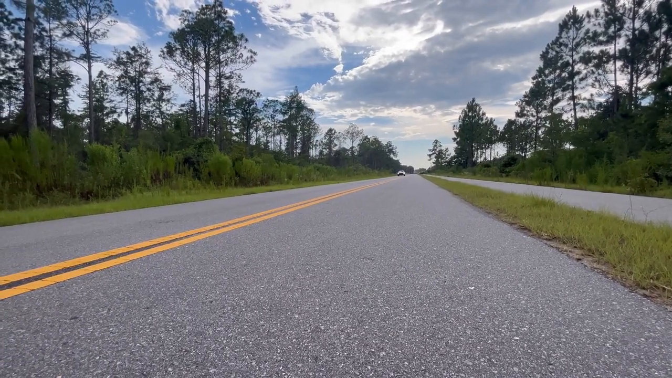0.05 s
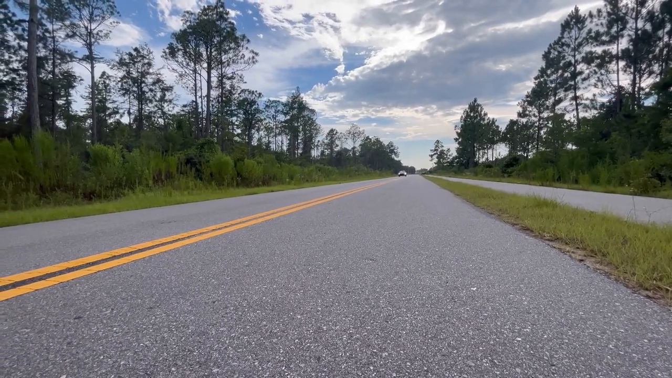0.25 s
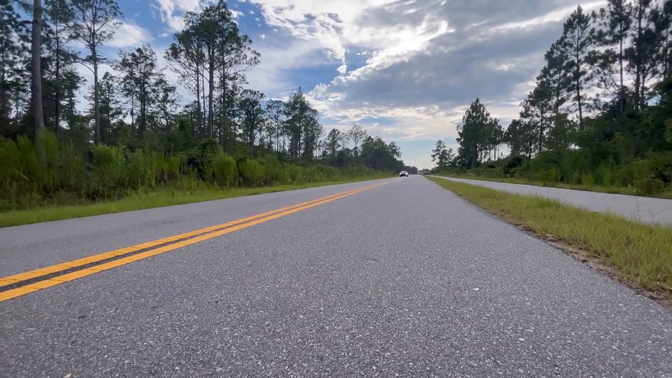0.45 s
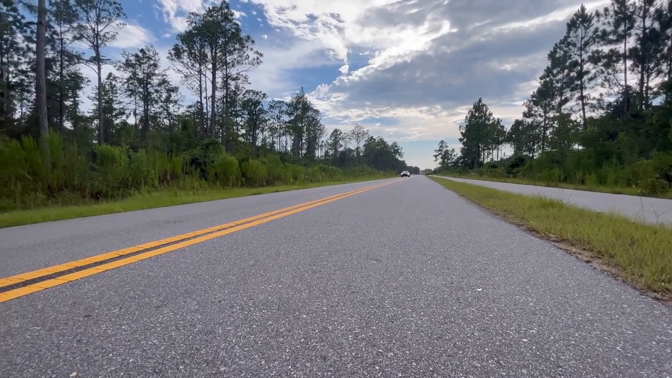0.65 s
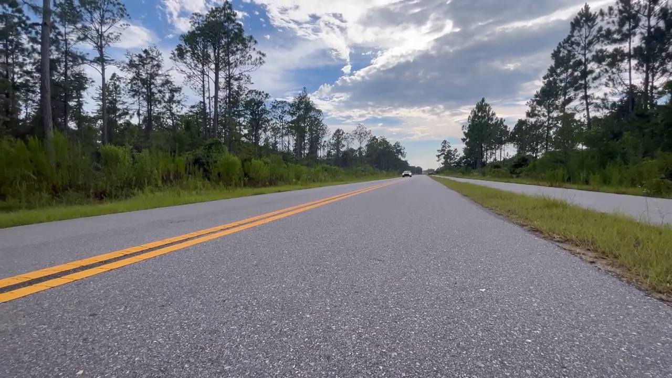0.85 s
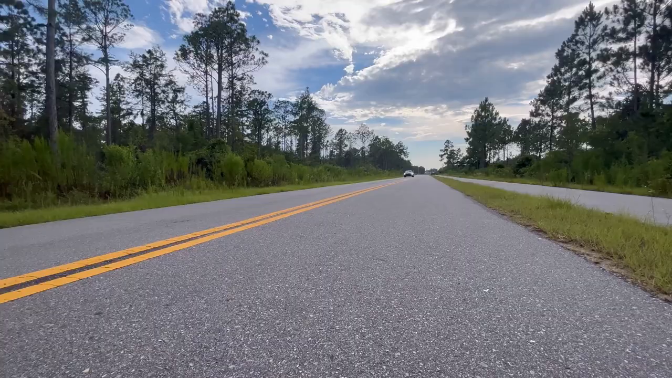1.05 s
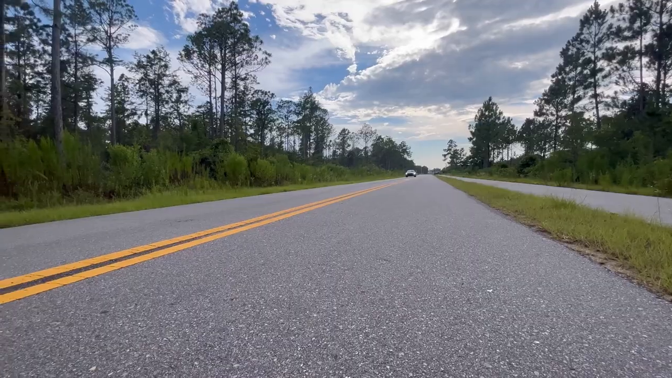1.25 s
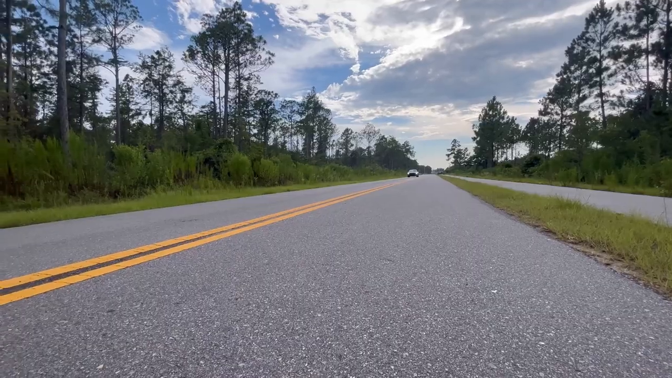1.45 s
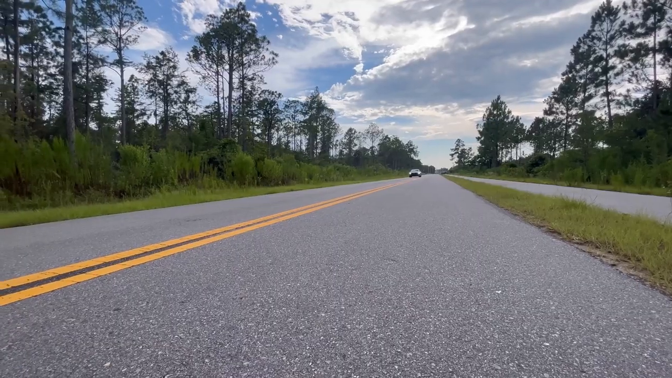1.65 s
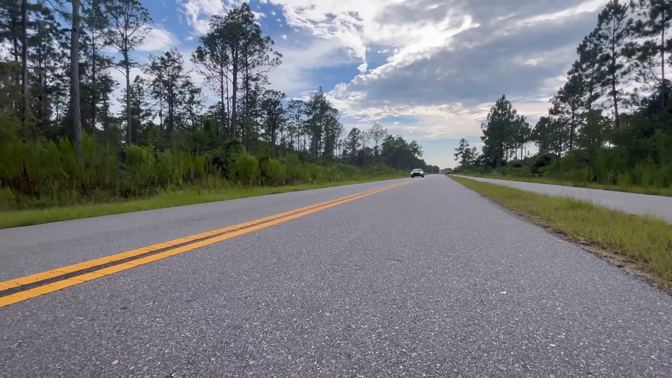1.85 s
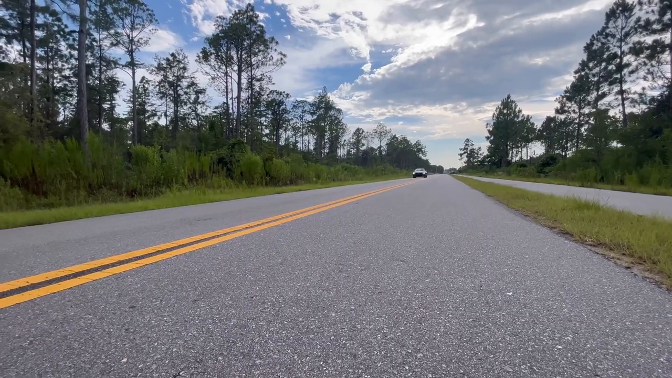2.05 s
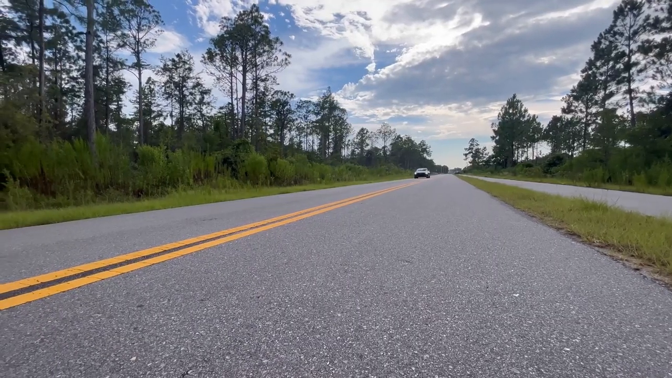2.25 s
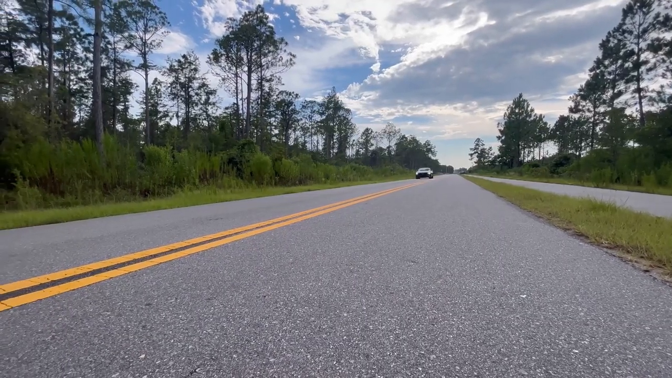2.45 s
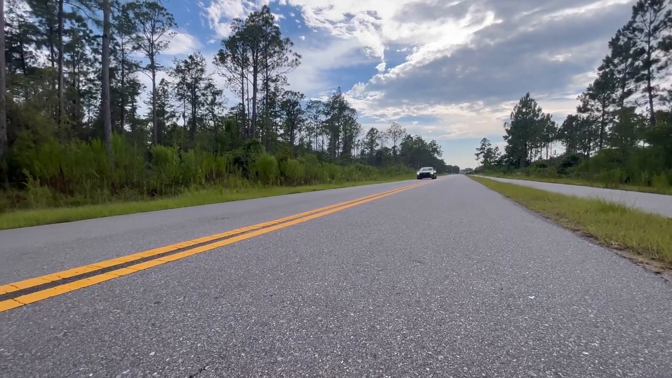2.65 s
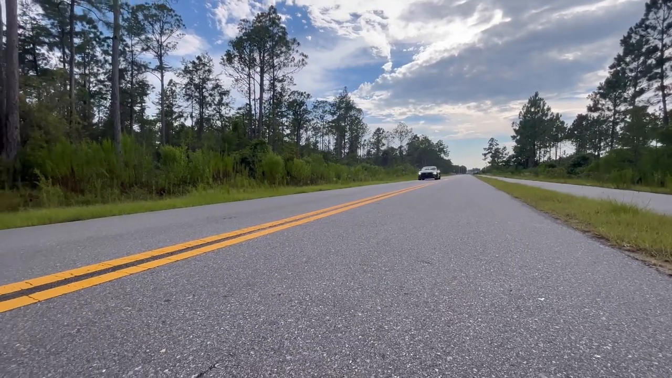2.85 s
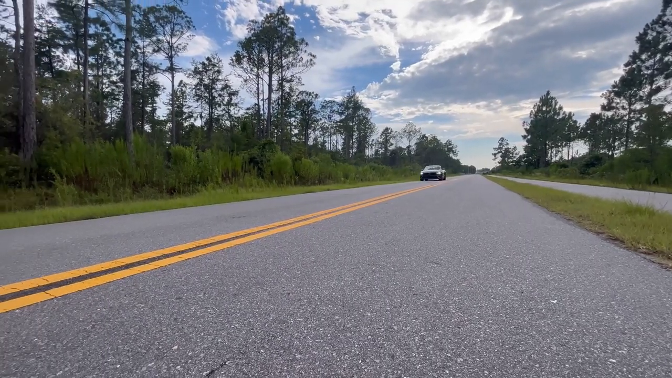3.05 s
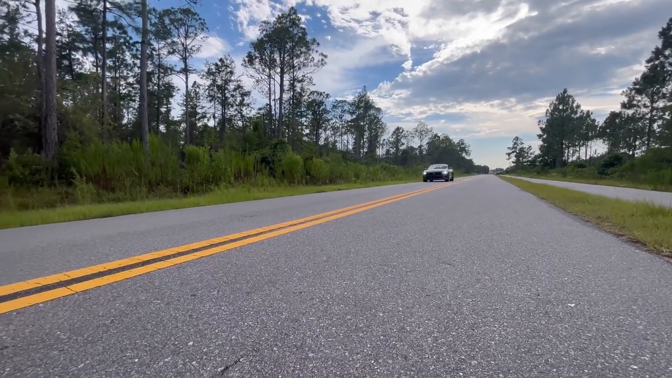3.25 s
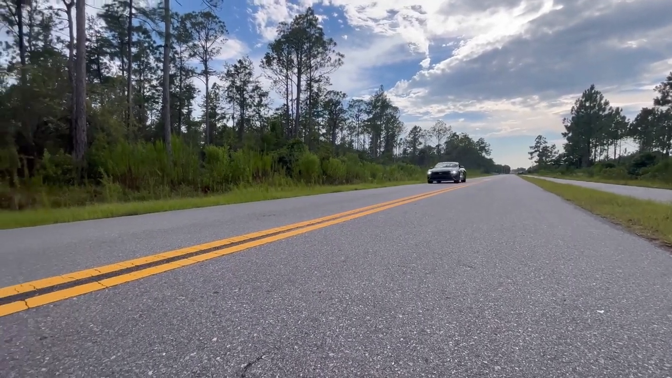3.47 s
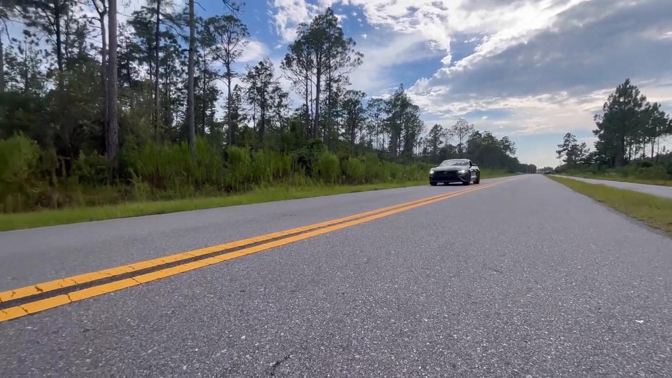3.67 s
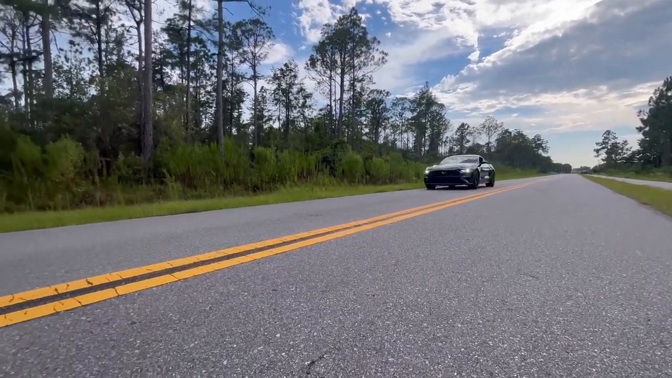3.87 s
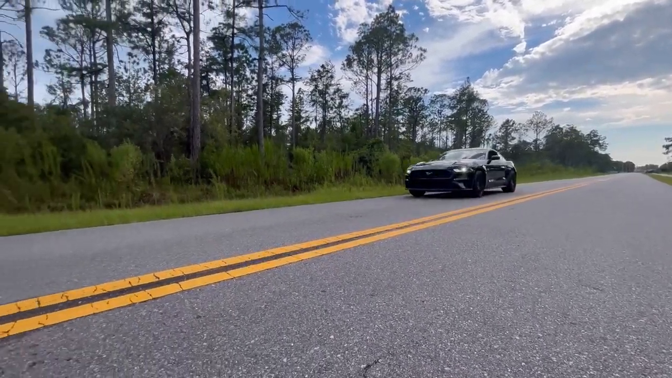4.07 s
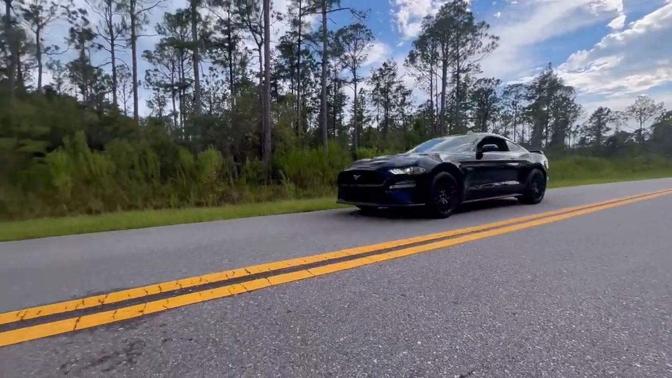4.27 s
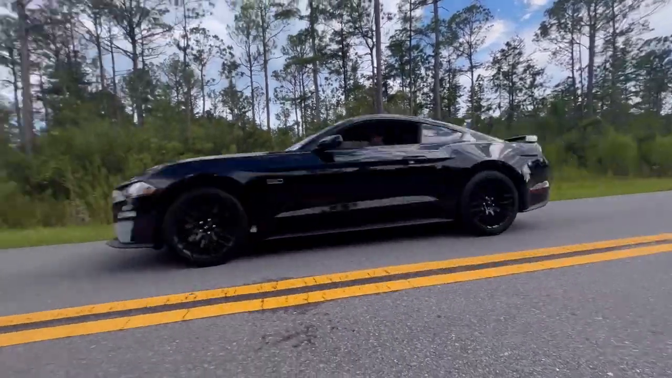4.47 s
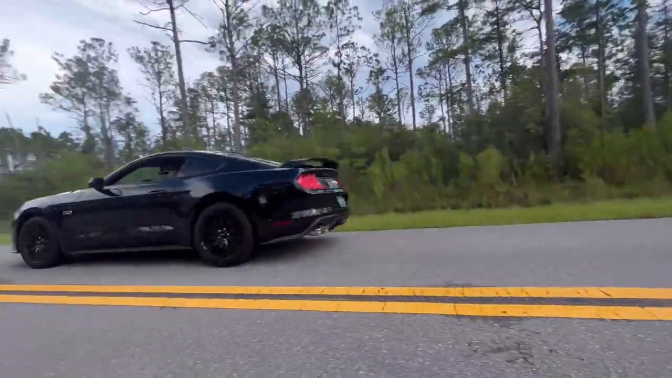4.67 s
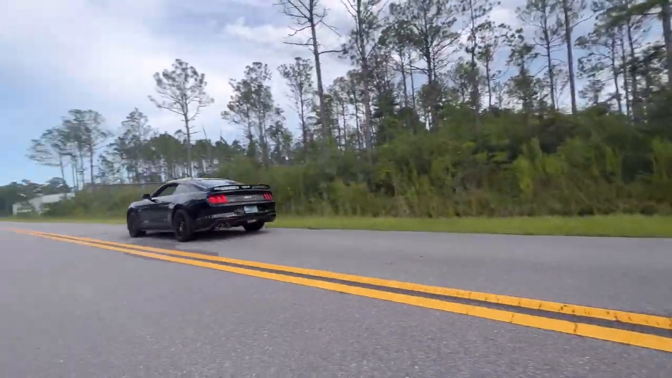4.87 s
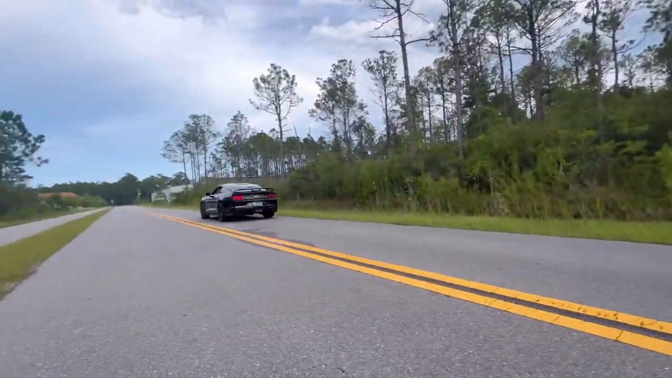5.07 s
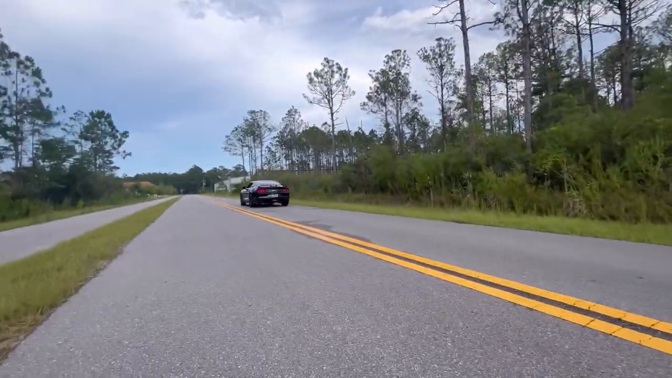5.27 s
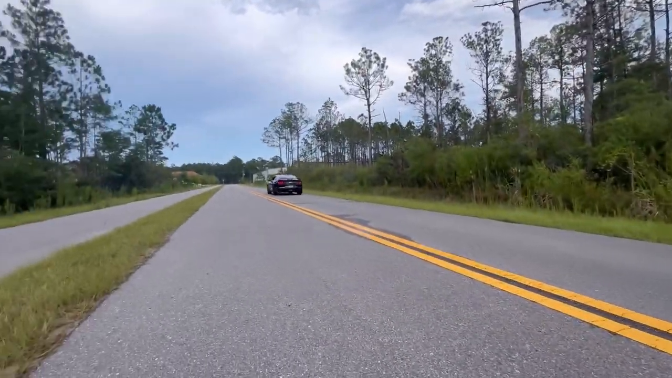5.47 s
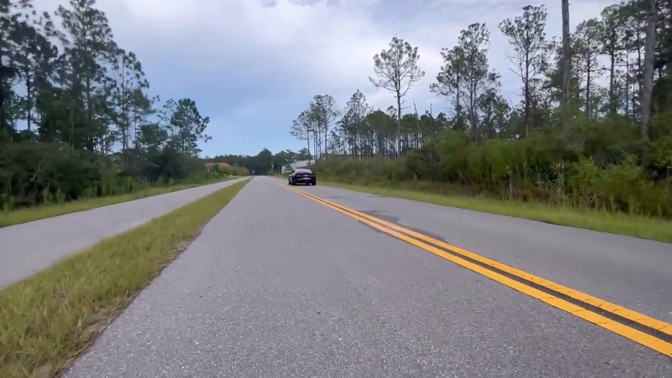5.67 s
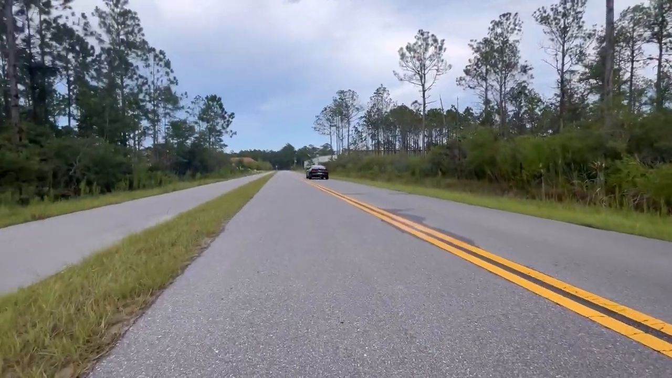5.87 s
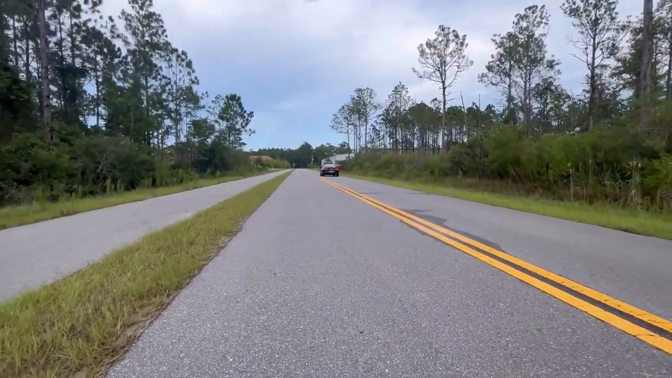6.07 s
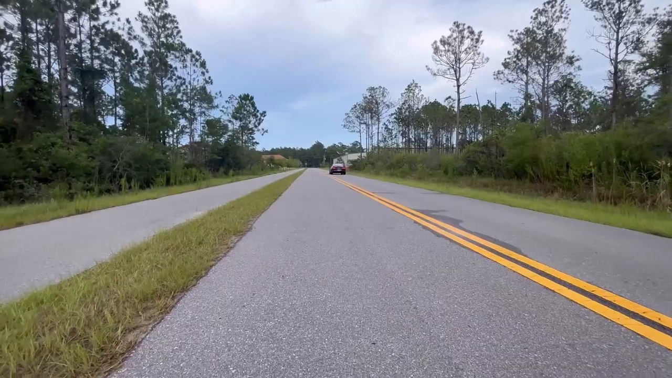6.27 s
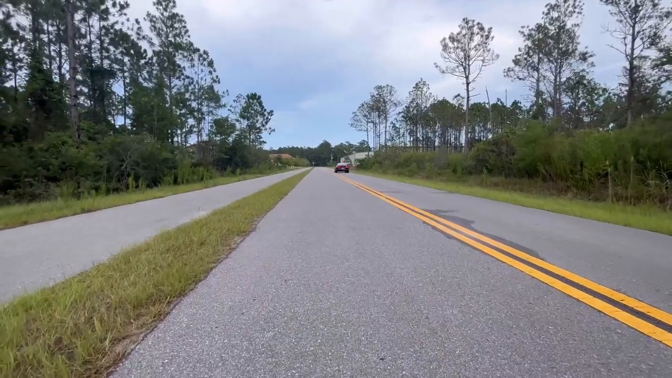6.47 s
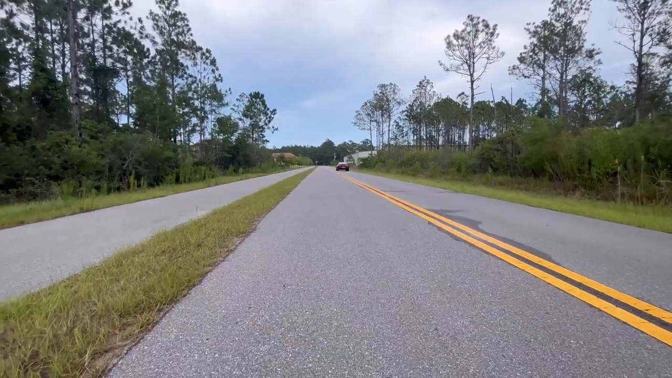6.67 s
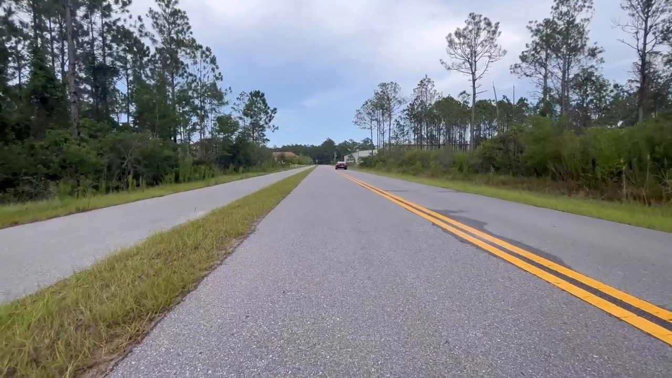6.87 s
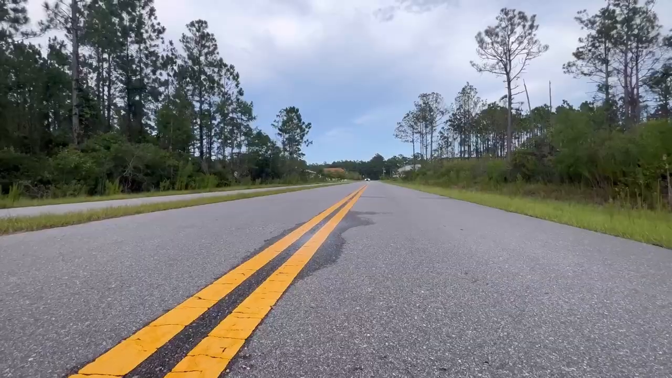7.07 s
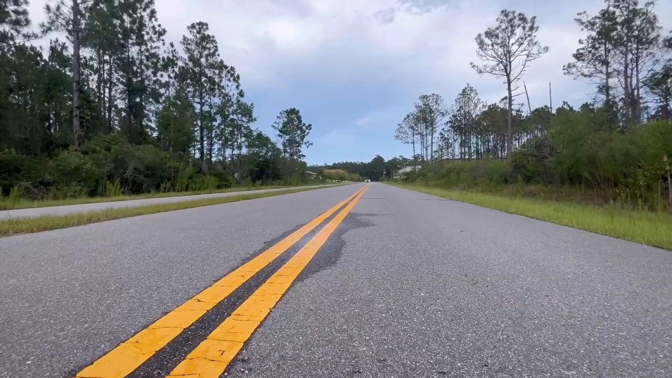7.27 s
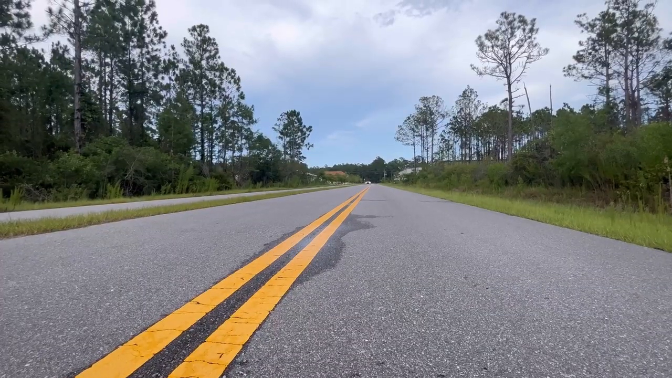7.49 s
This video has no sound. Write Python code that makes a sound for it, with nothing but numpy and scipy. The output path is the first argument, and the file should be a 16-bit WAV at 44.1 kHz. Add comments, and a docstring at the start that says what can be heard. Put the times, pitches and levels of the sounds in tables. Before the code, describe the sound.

Beside a country road among pines, a V8 sports car with a loud, uneven exhaust starts distant, its low growl climbing in pitch and swelling until about 2.1 s. The throttle lifts: pitch sags and the tone breaks into a loose, fluttering burble, with soft tyre hiss. At about 3.15 s full throttle returns abruptly, a thick roar growing with a brightening, barking rasp. It is closest around 4.5 s, with broad tyre hiss and a brief tread whine. From 4.55 to 5.2 s rapid dry snaps crack from the tailpipes, strongest near 4.8 s, as pitch drops slightly. The rasp recedes, with a few weak snaps at 5.5 s. Near 5.9 s the note breaks off for a gear change, coughs back at 6.1 s and drones faintly, blurred by forest scatter. At 7.03 s a cut: a quiet, dull distant engine accelerates over very thin high insects until 7.5 s.

```python
"""A V8 sports car with a loud exhaust on a country road lined with pines, heard from the roadside.
It pulls in the distance, lifts off and burbles, then roars up to the microphone at full throttle.
It passes with snaps and tyre hiss, recedes rasping and changes gear; then the scene cuts to a new distant
approach, the car accelerating. Uneven firings make a low tone of many lines, pulsed gas noise the rasp and
cracks, dry bursts the snaps; filtered noise makes the tyres, the forest scatter and, after the cut, insects."""
import sys
import numpy as np
from scipy import signal
from scipy.fft import rfft, irfft
from scipy.io import wavfile
from scipy.ndimage import uniform_filter1d

SR = 44100
rng = np.random.default_rng(int(sys.argv[2]) if len(sys.argv) > 2 else 0)


def file_out(sig):
    """Save sig as 16-bit WAV at sys.argv[1]."""
    # one column per channel
    cols = np.atleast_2d(sig).T
    # limit, then scale
    lim = np.clip(cols, -1, 1)
    pcm = np.round(lim * 32767).astype(np.int16)
    wavfile.write(sys.argv[1], SR, pcm)


N = 332073
TIME = np.arange(N) / SR

# the driver's pedal: (start [s], end [s]), and how long the pedal takes to act
LIFT_OFF, FULL_THROTTLE, PEDAL_S = (2.1, 3.117), (3.156, 6.12), 0.012
SHIFT_S, SHIFT_WIDTH_S = 5.89, 0.16   # the engine note breaks off for a gear change
REAR_IN_VIEW = (4.68, 0.2)   # the rear faces the microphone: (time [s], transition [s])
NEXT_PASS_S = 7.03   # the scene cuts to the next approach
# the eight firings of a cycle: (place in the cycle [0-1], strength [dB])
FIRINGS = [(.035, -8), (.155, -6), (.285, -11), (.415, -7), (.522, 0), (.655, -7), (.785, -8), (.91, -1.8)]
# rasp and sizzle: (low edge [Hz], high edge [Hz], base level when near [dB], share of the loudness swing,
# added at full throttle [dB], added lifted off [dB], added receding [dB])
REGISTERS = [(554, 1994, -21, 1.268, 1.5, -5.5, 7), (2120, 9250, -41.5, 1.29, 1, -0.8, 2.5)]


def from_db(db):
    """Decibels to gain."""
    return 10 ** (np.asarray(db) / 20)


def rms_one(x):
    """Scale to unit power."""
    return x / np.sqrt(np.mean(x ** 2) + 1e-20)


def in_time(rows):
    """Each column of a curve at every sample."""
    s, *columns = np.transpose(rows)
    return [np.interp(TIME, s, c) for c in columns]


def step(s, width_s):
    """A smooth rise from 0 to 1 around time s."""
    return .5 + .5 * np.tanh((TIME - s) / width_s)


def hump(s, width_s, height=1):
    """A bell-shaped swell around time s."""
    return height * np.exp(-((TIME - s) / width_s) ** 2 / 2)


def during(start_s, end_s):
    """1 while the pedal is held, with soft edges."""
    return step(start_s, PEDAL_S) - step(end_s, PEDAL_S)


def first_pass():
    """1 until the cut to the next approach."""
    return 1 - step(NEXT_PASS_S, .008)


def drift(rate):
    """Slow chance with spread 1, from noise through a two-pole lowpass at a fortieth of the sample rate."""
    r = np.exp(-80 * np.pi * rate / SR)
    noise = rng.standard_normal(N // 40 + 2002)
    slow = signal.lfilter([1], [1, -2 * r, r * r], noise)[2000:]
    return np.interp(np.arange(N) / 40, np.arange(len(slow)), rms_one(slow))


def stereo_noise(alike):
    """White noise of which a share of the power is common to both sides."""
    common = np.sqrt(alike) * rng.standard_normal(N)
    return common + np.sqrt(1 - alike) * rng.standard_normal((2, N))


def coloured(x, spectrum):
    """Causal (minimum-phase) filter with the given spectrum; unit power out."""
    size = 4096
    hz, db = np.transpose(spectrum)
    bins_hz = np.fft.rfftfreq(size, 1 / SR)
    log_gain = np.log(from_db(np.interp(np.log(bins_hz + 1), np.log(hz), db)))
    # folding the cepstrum forward in time makes the phase minimal
    cepstrum = irfft(log_gain) * np.r_[1, np.full(size // 2 - 1, 2), np.zeros(size // 2)]
    response = irfft(np.exp(rfft(cepstrum)))
    return rms_one(signal.oaconvolve(np.atleast_2d(x), response[None], axes=1)[:, :N])


def resonance(hz, centre_hz, width_hz, db):
    """The lift in dB that a resonance gives a line at hz."""
    return db / (1 + ((hz - centre_hz) / width_hz) ** 2)


def swept(x, hz, width_hz, block=256):
    """A resonance whose centre moves block by block; gain 1 on top."""
    out, state = np.zeros_like(x), np.zeros((len(x), 2))
    r = np.exp(-np.pi * width_hz / SR)
    zeros = np.array([1, 0, -1]) * (1 - r * r) / 2
    for i in range(0, N, block):
        poles = [1, -2 * r * np.cos(2 * np.pi * hz[i] / SR), r * r]
        out[:, i:i + block], state = signal.lfilter(zeros, poles, x[:, i:i + block], zi=state)
    return out


def register(x, low, high, db):
    """One band of a stereo sound, its slow level evened out and then set to db."""
    band_filter = signal.butter(4, [low, high], "band", fs=SR, output="sos")
    band = signal.sosfilt(band_filter, x)
    power = uniform_filter1d(uniform_filter1d(band.mean(0) ** 2, size=4900), size=3300)
    return band * from_db(db) / np.sqrt(np.abs(power) + 1e-12)


def forest(x, t60):
    """Countless trunks scatter the sound into a dying tail, different on each side."""
    age = np.arange(SR) / SR
    tail = rng.standard_normal((2, SR)) * from_db(-60 * age / t60)
    return rms_one(signal.oaconvolve(np.atleast_2d(x), tail, axes=1)[:, :N])


def radiated(x, direct_db, forest_t60=1.0, common=0.198):
    """Direct sound plus forest scatter, partly alike on both sides."""
    direct, scatter = from_db(direct_db), forest(x, forest_t60)
    scatter = rms_one(scatter + common * scatter[::-1])
    return (direct * x + scatter) / np.sqrt(1 + direct ** 2)


def from_bearing(x, lead_ms):
    """The nearer side hears the sound first; a positive lead is to the left."""
    return np.array([np.interp(TIME + side * lead_ms / 2000, TIME, x) for side in (1, -1)])


def manner(front_roar=0.43, rear_share=0.64):
    """How the pedal and the car's bearing set its roar, its directness and its stumbling."""
    floored, lifted = during(*FULL_THROTTLE), during(*LIFT_OFF)
    shifting = hump(SHIFT_S, SHIFT_WIDTH_S)
    passed = step(*REAR_IN_VIEW) * first_pass()
    before_shift = 1 - step(SHIFT_S - SHIFT_WIDTH_S, SHIFT_WIDTH_S)
    wide_open = floored * before_shift * (front_roar + (1 - front_roar) * passed)
    wide_open, behind = np.clip([wide_open, rear_share * passed], 0, 1)
    # direct over forest sound [dB]
    direct_db = -6.5 + 0.5 * floored + 7 * behind - 8.5 * shifting
    direct_db += hump(4.25, 0.19, 13)   # direct sound outweighs the forest as the car nears
    direct_db += 5 * step(6.54, 0.102) * first_pass()   # down the straight road the pops arrive crisp
    # uneven, stumbling combustion relative to the steady tone [dB], growing through the lift-off
    stumble_db = -17 + 18 * lifted * np.interp(TIME, LIFT_OFF, (0, 1)) + 12 * shifting
    # lead of the left ear as the car comes and goes
    front_lead_ms, back_lead_ms = -0.13, 0.14
    lead_ms = front_lead_ms * (1 - passed) + back_lead_ms * passed * wide_open
    return wide_open, behind, direct_db, stumble_db, lead_ms


def register_levels():
    """Rasp and sizzle follow the loudness, the pedal and the way the car points, in dB."""
    # loudness of rasp and sizzle, set by distance and effort: (time [s], level [dB])
    loudness = [(0.0, -33.5), (0.6, -29), (1.2, -28), (1.95, -24.5), (2.65, -29), (3.1, -28.5),
                (3.5, -21.5), (4.1, -18.5), (4.65, -19.5), (5.0, -25.5), (5.25, -31.5), (5.55, -32.5),
                (5.95, -49.5), (6.45, -43.5), (7.02, -44), (7.04, -52), (7.5, -43.5)]
    loud_db = in_time(loudness)[0] + 20   # relative to the car near the microphone
    # brief swells of the sizzle: (time [s], width [s], lift [dB])
    sizzle_swells = [(4.79, 0.036, 2), (5.12, 0.47, 10)]
    floored, lifted = during(*FULL_THROTTLE), during(*LIFT_OFF)
    receding = step(4.887, 0.046) * first_pass()   # the tailpipes point straight back
    levels = []
    for row, next_pass_db in zip(REGISTERS, (4, -0.5)):
        _, _, db, share, floored_db, lifted_db, receding_db = row
        level = db + share * loud_db + floored_db * floored + lifted_db * lifted
        levels.append(level + receding_db * receding + next_pass_db * (1 - first_pass()))
    rasping, sizzle = levels
    rasping = rasping + hump(4.69, 0.22, 3.9)   # flares as the car draws level
    rasping = rasping + hump(6.125, 0.012, 8)   # coughs as the next gear takes up
    return rasping, sizzle + sum(hump(*row) for row in sizzle_swells)


def exhaust(speed, cycle, spread_db=-13, left_db=0.57, treble_left_db=4.0):
    """Low tone and burble, a pulsed rasp above them, and cracks on top."""
    # level of the low exhaust tone: (time [s], level [dB])
    tone_level = [(0.0, -27), (0.06, -25), (1.19, -23.5), (1.91, -14.5), (2.14, -20), (2.16, -26),
                  (2.31, -20.5), (2.35, -24), (2.52, -21), (2.64, -27.5), (2.68, -25), (3.06, -28.5),
                  (3.19, -17.5), (3.69, -11.5), (4.72, -14), (5.16, -25.5), (5.68, -28.5), (6.08, -39.5),
                  (6.14, -32), (6.23, -36), (6.44, -33), (7.05, -37), (7.07, -34.5), (7.53, -35.5)]
    # colour of the burble: (frequency [Hz], relative level [dB])
    burble_colour = [(30, -30.5), (55, -15.5), (90, 6), (160, -10), (280, 10), (420, -2), (600, -7),
                     (900, -42)]
    wide_open, behind, direct_db, stumble_db, lead_ms = manner()
    burble = coloured(puffs(firing_pulses(cycle), decay_s=0.0061, channels=1), burble_colour)[0]
    low = exhaust_tone(speed, cycle) + from_db(stumble_db) * burble
    low = from_bearing(low, lead_ms) + from_db(spread_db) * forest(low, t60=1.0)
    low = register(low, 36, 582, in_time(tone_level)[0])
    surge = chug(cycle, wide_open, behind)
    rasp_db, sizzle_db = register_levels()
    rasp_edges, sizzle_edges = [row[:2] for row in REGISTERS]
    middle = register(surge * rasp(cycle, wide_open, behind, direct_db, lead_ms), *rasp_edges, rasp_db)
    top = register(surge * cracks(cycle, wide_open, direct_db), *sizzle_edges, sizzle_db)
    sides = np.array([[.5], [-.5]])
    return (low + middle) * from_db(left_db * sides) + top * from_db(treble_left_db * sides)


def exhaust_tone(speed, cycle, phase_waver=0.034, whoop_place=.635):
    """Uneven firing sounds every multiple of the cycle rate, in a balance set by pedal and bearing."""
    # lines of the tone: (multiple of the cycle rate, then relative level [dB] when pulling, coasting,
    # approaching, abreast, leaving, far down the road)
    order_db = [(2, -11, -12, -22, -15, -16, -26), (3, -4, -1, -13, -8, -11, -15),
                (4, -7, -10, -8, -10, -14, -19), (5, -7, -9, -2, 0, -13, -21),
                (6, -5, -6, -11, -9, -15, -18), (7, -4, -12, -9, -10, -11, -23), (8, 1, -3, -2, -3, -3, -9),
                (9, -9, -7, -6, -8, -4, -6), (10, -1, -3, -3, -1, -4, 0), (11, -1, -13, -8, -8, -3, -14),
                (12, -3, -14, -9, -3, -2, -7), (13, -9, -19, -1, -1, -3, -15),
                (14, -11, -21, -7, -6, -7, -16), (15, -5, -22, -1, -1, -6, -14),
                (16, -6, -19, 0, -4, -3, -23), (17, -13, -25, -10, -5, -9, -18),
                (18, -12, -25, -2, -11, -6, -19), (19, -17, -27, -8, -14, -6, -30),
                (20, -15, -27, -17, -16, -16, -16)]
    # resonances of muffler and pipes: (centre [Hz], width [Hz], lift [dB])
    pipe_resonances = [(90, 13, 3), (284, 30, 7), (401, 16, 4), (566.5, 6, 5.5)]
    coasting, floored = during(*LIFT_OFF), step(FULL_THROTTLE[0], PEDAL_S) * first_pass()
    beside, passed, gone = step(4.05, 0.06), step(4.77, 0.024), step(SHIFT_S, 0.19)
    pulling = np.clip(1 - coasting - floored, 0, 1)
    approaching, abreast = floored * (1 - beside), floored * (beside - passed)
    leaving, far_off = floored * (passed - gone), floored * gone
    shares = np.array([pulling, coasting, approaching, abreast, leaving, far_off])
    indirect = 1 - step(*REAR_IN_VIEW) * first_pass()
    # the pipes delay each higher line a little more, so every cycle has a hint of a rising whoop:
    # cycles of delay per multiple, and the multiple that arrives with the strongest firing
    delay_cycles, strongest_order = .085, 16
    tone, power = np.zeros(N), np.zeros(N)
    for order, *levels in order_db:
        # a line swells as it climbs through a resonance
        hz = order * speed
        pipes_db = sum(resonance(hz, *row) for row in pipe_resonances)
        db = np.dot(levels, shares) + (1 - floored) * pipes_db
        db += resonance(hz, 402, 21, hump(3.83, 0.24, 7.3))   # a bark on the approach
        if order == len(FIRINGS):
            db += pulling * resonance(hz, 282, 4.6, 11)   # the firing rate meets the drone resonance
        whoop = -order * whoop_place - delay_cycles * (order - strongest_order) ** 2 / 2
        turns = order * cycle + whoop + (.26 + .24 * indirect) * rng.uniform(-1, 1)
        waver_db = 1.4 + coasting * 2.5   # the lines break up off the throttle
        gain = from_db(db + waver_db * drift(3))
        tone += gain * np.sin(2 * np.pi * turns + phase_waver * drift(7.6))
        power += gain ** 2 / 2
    return tone / np.sqrt(power)


def firing_pulses(cycle, scatter_db=4.5, jitter_s=.00007):
    """One pressure impulse each time an exhaust valve opens, with chance in strength and timing."""
    place, strength_db = np.transpose(FIRINGS)
    turns = np.arange(int(cycle[-1]) + 1)[:, None] + place
    chance = rng.standard_normal((2,) + turns.shape)
    at = np.round((np.interp(turns, cycle, TIME) + jitter_s * chance[0]) * SR).astype(int)
    inside = (at > 0) & (at < N) & (turns < cycle[-1])
    pulses = np.zeros(N)
    pulses[at[inside]] = from_db(strength_db + scatter_db * chance[1])[inside]
    return pulses


def puffs(pulses, decay_s, channels):
    """Each pulse releases a dying burst of turbulent gas."""
    gate = signal.lfilter([1], [1, -np.exp(-1 / (decay_s * SR))], pulses + 1e-18)
    return rms_one(gate * rng.standard_normal((channels, N)))


def pipe_ring(pulses, echo, bounce, trip_s=0.000831, growth=1.63, wander=0.294, bounce_s=0.001973):
    """Reflections in the pipes smear each pulse; a bounce whose path changes as the car moves combs it."""
    # three allpass filters, each with a longer round trip
    for k in range(3):
        lag = int(trip_s * growth ** k * SR)
        taps = np.r_[echo, np.zeros(lag - 1), 1]
        pulses = signal.lfilter(taps, taps[::-1], pulses + 1e-18)
    path_s = bounce_s * np.exp(wander * drift(0.56))
    return rms_one(pulses + bounce * np.interp(TIME - path_s, TIME, pulses))


def chug(cycle, wide_open, behind, front_db=2.5, rear_db=1.0, place=0.53):
    """The strong firings bunch together: a surge once a cycle, on the approach and again far down the road."""
    depth_db = front_db * wide_open * (1 - behind) + rear_db * behind * (1 - wide_open)
    return from_db(depth_db * np.cos(2 * np.pi * (cycle - place)))


def rasp(cycle, wide_open, behind, direct_db, lead_ms, gas_db=-13, throat_hz=730.0):
    """Firing pulses and their gas noise, coloured by which side of the car is in view."""
    # colours of the rasp: far off, coasting, from the front, far behind, from behind and side-on;
    # each (frequency [Hz], relative level [dB])
    far_colour, coasting_colour, nose_colour = [(480, 0), (650, -5), (770, -13), (910, -3), (1020, -11),
                                                (1130, -10), (1300, -23), (1490, -15), (1680, -24),
                                                (1900, -18), (2400, -28)], [(480, -6), (608, 4), (785, -3.5), (922, 1),
                                                             (1140, -3), (1290, -22), (1470, 1),
                                                             (1650, -20), (1830, -4), (2400, -33)], [(480, 11), (560, 6),
                                                                               (650, 5), (760, -15),
                                                                               (870, -17), (1000, -10),
                                                                               (1150, -10.5), (1380, -21.5),
                                                                               (1700, -10), (2020, -10),
                                                                               (2400, -8)]
    far_tail_colour, tail_colour, beside_colour = [(480, -3), (540, -5), (650, -2), (874, -18),
                                                   (993, -11.5), (1250, -8.5), (1420, -21), (1680, -32),
                                                   (2400, -40)], [(480, -3), (550, -10), (615, -3),
                                                                     (665, -9), (720, -3), (860, -7),
                                                                     (1020, -7), (1180, -2), (1260, -2),
                                                                     (1450, -24), (1660, -27), (1960, -13),
                                                                     (2400, -18)], [(480, 16.5), (590, -1),
                                                                                   (720, 8.5), (900, -4.5),
                                                                                   (1190, 6), (1330, -5.5),
                                                                                   (1560, -13), (1780, -7),
                                                                                   (2100, 0), (2400, -32.5)]
    # a bright resonance moves as the car swings side-on: (time [s], centre [Hz], level [dB])
    honk_curve = [(3.2, 960, -33), (3.55, 1130, -1), (4.15, 1000, 9), (4.32, 1050, -3), (4.47, 1166, 11),
                  (4.65, 1210, 0), (4.8, 1170, -19), (5.0, 1130, -36), (5.3, 1160, -34)]
    # close by all eight firings are heard; far down the road the strongest stands out
    contrast = 1.25 - hump(4.8, .2, .45) + .45 * step(6.2, .1) * first_pass()
    pulses = firing_pulses(cycle, scatter_db=1.0, jitter_s=.00005) ** contrast
    ring = from_bearing(pipe_ring(pulses, echo=.15, bounce=.35), lead_ms)
    gas = puffs(pulses, decay_s=.003, channels=2)
    source = ring + from_db(gas_db + 6 * behind * wide_open) * gas
    # the tailpipes beam their rasp backwards
    heard = radiated(source, direct_db + 3 + 7 * behind)
    lifted, abreast = during(*LIFT_OFF), hump(4.496, 0.32)
    far = (1 - lifted) * coloured(heard, far_colour) + lifted * coloured(heard, coasting_colour)
    front = (1 - wide_open) * far + wide_open * coloured(heard, nose_colour)
    rear = (1 - wide_open) * coloured(heard, far_tail_colour) + wide_open * coloured(heard, tail_colour)
    end_on = (1 - behind) * front + behind * rear
    sound = (1 - abreast) * end_on + abreast * coloured(heard, beside_colour)
    # a lower resonance opens up near the microphone
    throat = hump(4.17, 0.47) * from_db(2.8) * swept(sound, np.full(N, throat_hz), width_hz=45)
    honk_hz, honk_db = in_time(honk_curve)
    honk = from_db(honk_db) * swept(sound, honk_hz, width_hz=120)
    sound = sound + throat + honk
    # at the greatest distance the air takes away the top of the rasp
    dull = signal.sosfilt(signal.butter(2, 1100, fs=SR, output="sos"), sound)
    return first_pass() * sound + (1 - first_pass()) * dull


def cracks(cycle, wide_open, direct_db, ring_db=-5, far_blur_db=17):
    """At full throttle the strongest pulses steepen into shocks; distance blurs and dulls them."""
    # colours of the cracks: near, far ahead and far behind; each (frequency [Hz], relative level [dB])
    near_colour, ahead_colour, gone_colour = [(2000, 4.5), (2800, 2.5), (3300, -4.5), (3900, 0.5),
                                              (5400, -11), (6700, -12), (8000, -25), (9500, -18),
                                              (12000, -13), (15500, -16.5)], [(2000, 8.5), (2600, 7.5), (3100, 8),
                                                                  (3550, 4), (4000, 6), (4700, -10.5),
                                                                  (5400, -11.5), (6600, -7.5), (8000, -17),
                                                                  (9300, -37), (10800, -22.5), (13000, -49)], [(2000, 0), (2350, 4),
                                                                                     (2700, -11), (3100, 0),
                                                                                     (3550, -9), (4100, -1),
                                                                                     (4650, -3),
                                                                                     (5100, -17),
                                                                                     (6600, -15),
                                                                                     (13000, -32)]
    shocks = firing_pulses(cycle, scatter_db=1.5, jitter_s=.00003) ** 1.25
    ring = pipe_ring(shocks, echo=0.41, bounce=0.85, trip_s=.0007, bounce_s=0.001056)
    gas = puffs(shocks, decay_s=0.0028, channels=2)
    source = gas + from_db(ring_db) * ring
    crack_direct_db = direct_db + 5 - far_blur_db * (1 - wide_open)
    heard = radiated(source, crack_direct_db, forest_t60=0.28, common=0.16)
    gone = step(SHIFT_S, .1) * first_pass()
    far = (1 - gone) * coloured(heard, ahead_colour) + gone * coloured(heard, gone_colour)
    return wide_open * coloured(heard, near_colour) + (1 - wide_open) * far


def tyres(song_width_hz=260):
    """Tread hiss that swells as the car comes close, with a sweeping resonance."""
    # tyres on coarse asphalt: (time [s], level [dB])
    hiss_level = [(0, -47), (1.9, -37.5), (2.8, -42), (3.5, -31), (4.1, -31), (4.5, -27.5), (4.8, -38),
                  (5.3, -70), (5.8, -55), (7.53, -63)]
    # colour of the hiss: (frequency [Hz], relative level [dB])
    asphalt_colour = [(200, 9.5), (900, 10), (2000, 2), (4000, -13.5), (6500, -20), (8000, -20),
                      (9500, -15), (12000, -24), (14200, -32), (15500, -39.5)]
    # the tread sings and sweeps down as it passes: (time [s], centre [Hz], level [dB])
    tread_song = [(3.7, 2040, -70.5), (4.1, 2000, -28.5), (4.55, 2210, -59), (4.68, 2010, -23),
                  (4.8, 1790, -79), (5.1, 1760, -72.5)]
    hz, db = in_time(tread_song)
    song = from_db(db) * rms_one(swept(rng.standard_normal((2, N)), hz, song_width_hz))
    hiss = coloured(stereo_noise(alike=0.22), asphalt_colour)
    return song + from_db(in_time(hiss_level)[0]) * hiss


def swells():
    """A soft low bump, the push of air from the passing car and briefly swelling hums: wavering sines."""
    # short low swells: (time [s], length [s], frequency [Hz], width [Hz], level [dB])
    low_swells = [(1.48, 0.022, 76, 65, -24), (4.646, 0.06, 79.7, 37, -29), (6.333, 0.081, 106, 3.9, -37),
                  (7.33, 0.16, 90, 4.05, -40)]
    out = np.zeros(N)
    for s, length, hz, width_hz, db in low_swells:
        phase = 2 * np.pi * np.cumsum(hz + width_hz / 2 * drift(10.0)) / SR
        out += from_db(db) * np.sqrt(2) * np.sin(phase) * hump(s, length)
    return out


def snaps(ring_db=2, width_hz=1200, scatter_db=8.5, rise_s=.0011, crest_db=8):
    """Each sharp snap from the tailpipes is a short cluster of dry bursts, with a ring of its own pitch."""
    # the snaps: (time [s], nominal peak [dB], centre [Hz])
    snap_list = [(4.5533, -25, 3000), (4.5673, -19, 3000), (4.5892, -16, 3400), (4.6251, -19, 3600),
                 (4.6616, -20, 3200), (4.6975, -18, 3400), (4.7349, -11, 3200), (4.7723, -11, 3700),
                 (4.8097, -11, 3400), (4.8471, -14, 4400), (4.863, -15, 5000), (4.885, -18, 3200),
                 (4.9, -19, 4800), (4.9225, -24, 2800), (4.9369, -17, 5200), (4.9594, -20, 3000),
                 (4.9748, -19, 5600), (4.9968, -21, 3000), (5.012, -22, 5500), (5.0337, -25, 2800),
                 (5.0711, -22, 3200), (5.1045, -20, 4200), (5.123, -25, 6000), (5.1455, -23, 3400),
                 (5.1829, -24, 3000), (5.4528, -25, 3200), (5.4747, -31, 3800), (5.5116, -32, 3200)]
    # a snap and its weaker followers from the next firings: (delay [s], level [dB])
    cluster = [(0, 0), (.004, -5), (.0145, -11)]
    # colour of the gas noise: (frequency [Hz], relative level [dB])
    snap_colour = [(1000, -24), (2000, 3), (2800, 5.5), (4200, 3.5), (6500, -1.5), (9500, -9), (15500, -24)]
    bursts, centre = np.zeros(N), np.full(N, snap_list[0][2], float)
    age = TIME[:SR // 20] / rise_s
    shape = age * np.exp(1 - age)
    for s, db, hz in snap_list:
        centre[int(s * SR):] = hz
        for delay, loss_db in cluster:
            at = int((s + delay) * SR)
            chance_db = (delay > 0) * scatter_db * rng.normal()   # only the followers vary
            bursts[at:at + len(age)] += from_db(db - crest_db + loss_db + chance_db) * shape
    gas = coloured(stereo_noise(alike=0.36), snap_colour)
    ring = rms_one(swept(gas, centre, width_hz))
    return bursts * rms_one(gas + from_db(ring_db) * ring)


def insects(level_db=-71):
    """A thin, steady insect chorus at the place of the second pass: noise in narrow high bands."""
    # colour of the chorus: (frequency [Hz], relative level [dB])
    insect_colour = [(6500, -45.5), (8000, -24), (8900, -3), (9700, -18.5), (10500, -11), (11300, -46),
                     (13000, -49)]
    chorus = coloured(rng.standard_normal((2, N)), insect_colour)
    return (TIME > NEXT_PASS_S) * from_db(level_db) * chorus


def scene():
    """The car and the roadside."""
    # engine speed as heard, Doppler shift included: (time [s], eight-cylinder cycles [1/s])
    speed_curve = [(0.0, 25.69), (1.6, 34.47), (2.08, 35.72), (2.62, 27.85), (3.05, 23.61), (4.48, 28.44),
                   (4.78, 26.61), (5.4, 27.37), (5.68, 27.51), (5.98, 26.05), (6.35, 26.9), (7.02, 25.11),
                   (7.04, 27.8), (7.53, 31.66)]
    speed, = in_time(speed_curve)
    # cycles turned so far, with a slight hunting of the engine
    cycle = .135 + np.cumsum(speed) / SR + .003 * drift(2.5)
    return exhaust(speed, cycle) + tyres() + swells() + snaps() + insects()


def record(dry):
    """Only the highest peaks are rounded, and the top is cut."""
    rounded = dry / (1 + (dry / .93) ** 6) ** (1 / 6)
    return signal.sosfilt(signal.cheby2(12, 70, 15700, fs=SR, output="sos"), rounded)


dry = scene()
out = record(dry)
file_out(out)
```